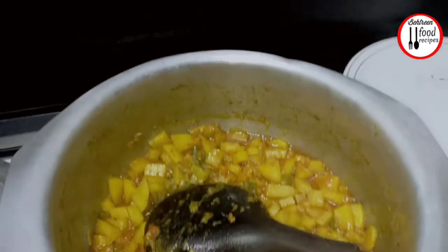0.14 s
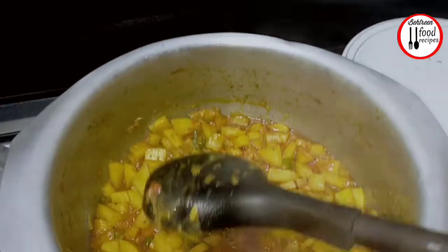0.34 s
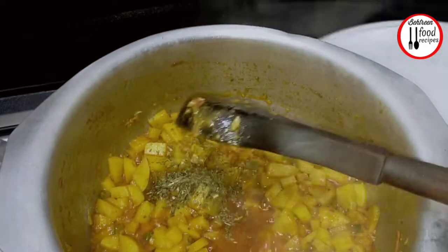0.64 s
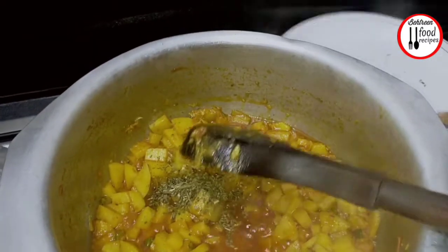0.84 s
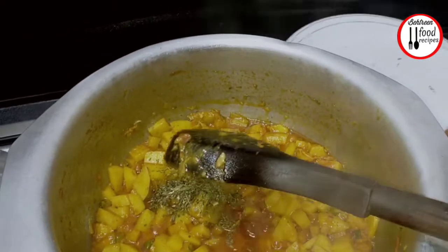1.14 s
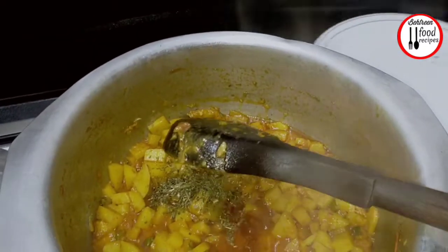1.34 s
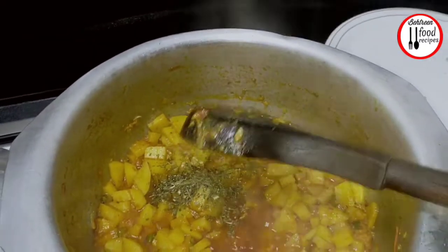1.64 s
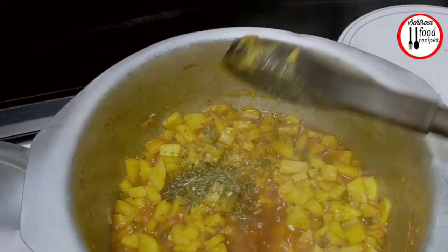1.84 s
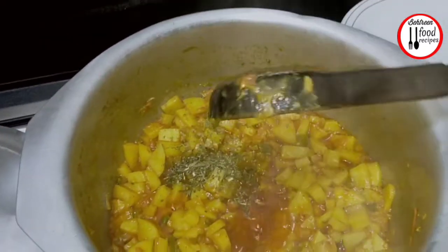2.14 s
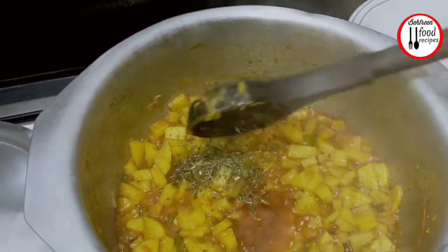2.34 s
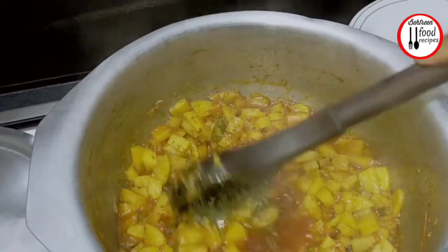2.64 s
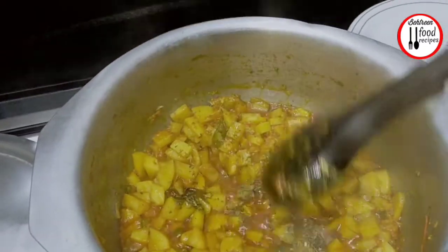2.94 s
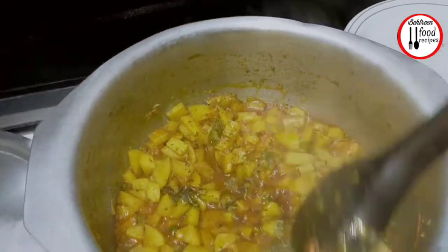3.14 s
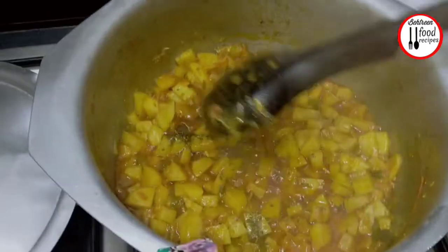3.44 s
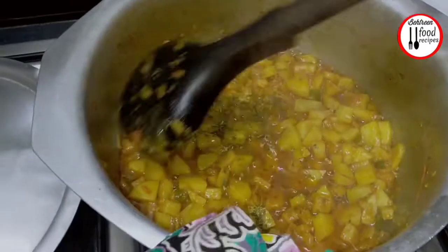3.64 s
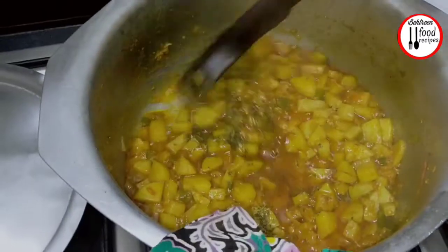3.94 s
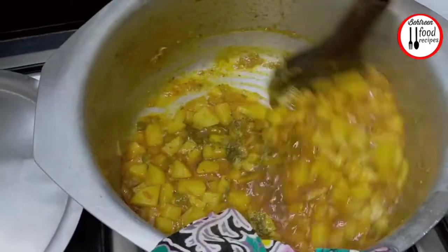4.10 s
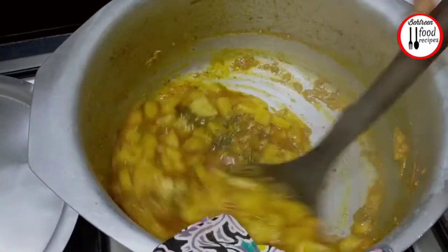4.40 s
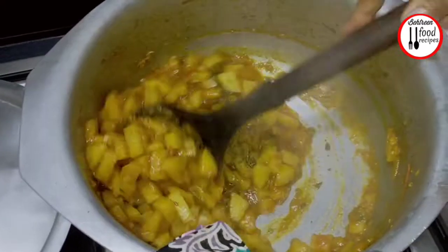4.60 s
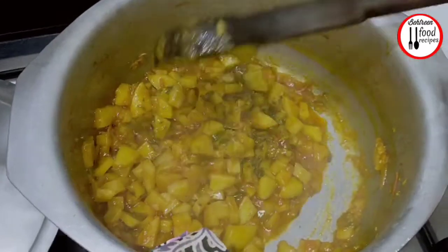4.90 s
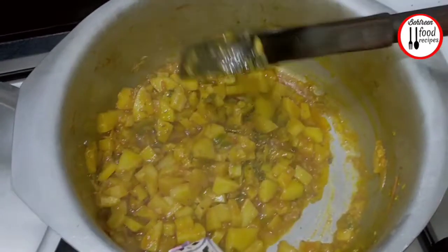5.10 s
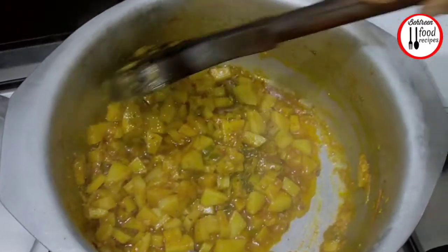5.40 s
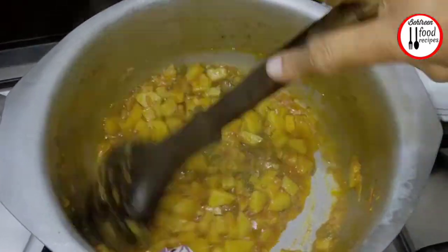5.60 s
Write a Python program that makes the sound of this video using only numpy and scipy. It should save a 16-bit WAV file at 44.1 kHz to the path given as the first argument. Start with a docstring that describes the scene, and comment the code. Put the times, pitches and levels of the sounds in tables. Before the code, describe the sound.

From the start to about 0.75 s, a metal pot of curry is jolted on its stove grate: a rapid, uneven string of loud ringing clanks with low booms and thuds, strongest around 0.3-0.75 s, with gritty grinding from 0.4 s. From 0.95 to 1.25 s it slides again with short low groans, then a solid knock at 1.3 s and a faint one at 1.43 s. The rumble fades by 1.8 s, leaving quiet simmer, fine crackling sizzle and popping bubbles. From 2.4 s a spoon makes soft, wet, scraping strokes, fuller and faster from 3.6 to 4.7 s, with a dull knock at 3.6 s, dry ticks near 3.7 s and faint taps. Bubbling calms by 4.7 s; a gentler stroke follows at 5.3-5.75 s, with a tiny low gulp at 5.5 s. Thin, bright bangle clinks are scattered throughout, clearest near 0.6 and 3.9 s. Close, nasal microphone, small kitchen.

```python
"""A stove top booms and thuds as a metal pot of simmering curry is dragged and jolted into place on its grate.
Then a wooden spoon ploughs through the wet vegetables, knocks on the pot and ticks drily. Bubbles pop, short squeaks
and a low gulp are heard, the sauce sizzles, and something small and bright, likely bangles on the cook's wrist, clinks.
Blows and slips ring a bank of pot modes, click-fed resonators make the small bubbles, gliding sines the pops and ticks,
detuned decaying sines the bangles, coloured clicks and noise the simmer. The close microphone has a nasal peak."""
import sys
import numpy as np
from scipy import signal
from scipy.fft import rfft, irfft, next_fast_len
from scipy.io import wavfile
from scipy.ndimage import uniform_filter1d, minimum_filter1d

SR = 44100
rng = np.random.default_rng(int(sys.argv[2]) if len(sys.argv) > 2 else 0)


def dump(signal):
    """Clip the signal to [-1, 1] and save it as 16-bit WAV at the path in sys.argv[1]."""
    limited = np.clip(np.atleast_2d(signal).T, -1, 1)
    pcm = np.round(limited * 32767).astype(np.int16)
    wavfile.write(sys.argv[1], SR, pcm)


N = 253977

# pot catching on the grate: [t/s, strength/dB, weight/dB, grit/dB, rebound delay/s, favoured mode f/Hz]
JOLTS = [(.0389, -12.5, 1, -5, 0.03, 2450), (.0948, -13.5, 4, -2, .012, 2500),
         (.1999, -13.5, 0.5, -3.5, 0.035, 2637), (.3048, -9, 3, -3, 0.012, 2560),
         (.3972, -6, -7.5, 6.5, 0.024, 2396), (.4506, -7.5, -1.5, 8, 0.02, 2530),
         (.519, -8, -9.5, 6, 0.018, 2460), (.589, -9.5, 7.5, 6.5, .039, 2345),
         (.7108, -12, -1, 9.5, 0.024, 2590), (.7284, -10.5, 10, 1.5, .012, 2475),
         (1.1537, -17, 13.5, -1.5, 0.049, 2470), (1.3131, -8, 2.5, -8.5, 0.069, 843),
         (1.4343, -22.5, 5.5, 0, 0.037, 1157)]
# spoon against the pot: [t/s, strength/dB, weight/dB, grit/dB, rebound delay/s, favoured mode f/Hz]
KNOCKS = [(3.1108, -41.5, 15.5, 0, 0.0063, 791), (3.6171, -27.5, -3.5, -4.5, .017, 169.6),
          (3.7771, -42, 13.5, 4, 0.027, 399), (4.279, -46.5, -6, 9, 0.035, 2450),
          (4.4984, -47.5, 3, -5, 0.015, 2500), (5.3121, -39.5, 4.5, 1.5, 0.0052, 423)]
# bubble pops, short squeaks, dry spoon ticks and a low gulp: [t/s, level before trim/dB, starting f/Hz, t60/s]
POPS_AND_TICKS = [(0.681, -25, 2570, 0.021), (0.915, -27.5, 2213, 0.11), (0.962, -20, 2420, 0.033),
                  (0.982, -24, 2210, 0.033), (2.186, -34.5, 2710, 0.048), (2.332, -31, 7220, 0.011),
                  (2.922, -33, 2416, 0.061), (3.335, -22, 2576, 0.028), (3.701, -18.5, 2700, 0.0064),
                  (3.728, -16, 3050, 0.0036), (3.7463, -14.5, 2540, 0.0049), (3.868, -27, 2490, 0.019),
                  (4.056, -26.5, 2360, 0.056), (4.68, -25, 2420, 0.016), (4.714, -30.5, 2340, 0.038),
                  (4.989, -33.5, 10060, 0.013), (5.488, -22, 2500, 0.007), (5.511, -37.5, 255, 0.16),
                  (5.626, -31.5, 2446, 0.027)]
# bangles touching: [t/s, level before trim/dB]
CLINKS = [(0.2099, -41), (0.607, -29), (1.7836, -34.5), (2.6155, -37), (3.5778, -34.5), (3.594, -35),
          (3.8977, -26.5), (4.4573, -38), (4.671, -37.5), (5.3102, -33), (5.59, -38)]
# pot and stove top ringing together, before each spot's own balance: [f/Hz, energy level/dB, t60/s]
POT_MODES = [(82.3,-23,1),(97.67,-21,0.71),(117.9,-27,1),(150.3,-26,0.21),(172,-32.5,1),(244.8,-26.5,0.79),(294.2,-23.5,0.41),(332.3,-23,0.79),(415.6,-28.5,0.66),(800.6,-19.5,0.24),(865,-25.5,0.6),(937,-24,0.25),(1064,-24,0.045),(1176,-24,0.27),(1310,-25,0.29),(1560,-26.5,0.39),(1730,-24.5,0.15),(1926,-22,0.21),(2302,-23,0.19),(2398,-21.5,0.25),(2575,-26,0.22),(2598,-20,0.059),(2780,-21.5,0.17),(3350,-22,0.23)]
# decay of the crowd of weaker pot modes: [f/Hz, t60/s]
POT_DECAY = [(90,1),(300,0.34),(1000,0.29),(2500,0.24),(7000,0.18),(15000,0.18)]
# how readily the grate contact sounds: [f/Hz, level/dB]
JOLT_COLOUR = [(45,9.5),(100,18),(180,12.5),(320,14),(550,18.5),(1200,25),(2500,24),(6000,4)]
# how readily the spoon contact sounds: [f/Hz, level/dB]
KNOCK_COLOUR = [(45,17),(100,35),(180,37.7),(350,28.9),(600,26),(1000,32.2),(1700,28.6),(2500,29.9),(6000,20.6)]
# microphone and its port resonances: [f/Hz, level/dB]
MIC = [(45,3),(75,0.5),(1800,-1.5),(2150,0.5),(2480,7.5),(2800,2),(3150,0.5),(5000,-2.5),(5900,-1),(8200,0),(9200,-14),(11000,-8.5),(13000,-19.5),(15500,-14.5)]
# bangle modes before each ring's detuning: [f/Hz, level/dB, t60/s]
BANGLE_MODES = [(8770,-9.5,0.064),(10560,-6,0.087),(12500,-4,0.064),(13300,3,.06),(13500,-9,.06),(14200,-18,.07),(14600,9,0.048),(15100,0,0.074),(15650,-18,.07)]
# the hollow above the curry, colouring simmer and stirring: [f/Hz, level per Hz/dB]
HOLLOW = [(25,8.5),(60,6),(110,4.5),(200,1.5),(330,10),(600,0.5),(800,-0.5),(1020,8.5),(1300,-3),(2500,3.5),(5000,-8.5),(9000,-0.5),(15000,9.5)]
# stove top shaken by the pot, before trim: [t/s, boom level/dB, thud level/dB]
STOVE = [(0.0, -37, -43.5), (0.11, -43.5, -37), (0.24, -47, -53), (0.416, -35.5, -29), (0.7, -37, -32),
         (0.746, -36, -25), (1.012, -36.5, -38.5), (1.222, -40.5, -37), (1.258, -47, -40),
         (1.328, -42.5, -43.5), (1.774, -62, -59), (1.8, -70, -56.5)]
# the pot's foot catching and groaning: [t/s, length/s, level/dB, central slip rate/Hz, glide/octaves]
GROANS = [(0.943,0.063,-33,430,0.29),(1.062,0.043,-29,350,-0.026),(1.192,0.061,-30.5,395,.04)]
# share of a blow's weight heard across the spectrum: [f/Hz, share]
WEIGHT_SHARE = [(350,0.83),(1000,0.84),(2500,0.047)]
# share of a blow's grit heard across the spectrum: [f/Hz, share]
GRIT_SHARE = [(2500,0),(6000,1)]
# pot sliding on the grate: [t/s, length/s, force level/dB]
SLIDES = [(.04, 0.057, -7), (.39, 0.27, 0), (.71, 0.037, 0), (.945, 0.3, -8), (1.33, 0.073, -29)]
# spoon strokes through the curry: [t/s, length/s, speed level/dB, pressure level on the pot/dB]
STROKES = [(2.39, .34, -5, -13), (2.76, 0.23, -9.5, -13), (3.16, 0.19, -7.5, -2), (3.63, 0.26, -3, 0.5),
           (3.92, 0.33, 0, -0.5), (4.27, 0.19, -2, 2), (4.49, .2, -5.5, -15), (5.32, 0.42, -11, -2)]

TIME = np.arange(N) / SR
RING_TIME = TIME[:SR]
CUTOFF_HZ = 16100
BOOM_HZ, THUD_HZ = (70, 200), (210, 520)
REBOUND_LOSS_DB_PER_S = 177  # the later the rebound, the weaker it is
SLIDE_ATTACK_S, SLIDE_RELEASE_S = 0.012, 0.083
STROKE_ATTACK_S, STROKE_RELEASE_S = 0.025, 0.031
# bubbling at rest, against a full stroke; it calms as cool vegetables are turned onto the base
REST_DB, CALMED_DB, CALMED_AT_S, CALMING_S = -9.5, -16, 4.73, 0.52


def from_db(db):
    """Decibels to gain."""
    return 10 ** (np.asarray(db) / 20)


def rms_one(x):
    """Scale to unit rms."""
    return x / np.sqrt(np.mean(x ** 2) + 1e-20)


def gains_in_time(rows):
    """One gain curve per dB column, fading to silence within 50 ms outside the rows."""
    s, *columns = np.transpose(rows)
    present = np.interp(TIME, [s[0] - .05, s[0], s[-1], s[-1] + .05], [0, 1, 1, 0])
    return [from_db(np.interp(TIME, s, column)) * present for column in columns]


def gestures(rows, attack_s, release_s):
    """Each movement swells, holds for its length and dies away; one gain curve per dB column."""
    power = 0
    for s, length, *levels_db in rows:
        swell = np.clip((TIME - s) / attack_s, 0, 1)
        release = np.exp(-np.maximum(TIME - s - length, 0) / release_s)
        power = power + np.outer(from_db(levels_db), swell * release) ** 2
    return np.sqrt(power)


def at_hz(points, hz):
    """Read a spectrum on a log-frequency axis."""
    f, value = np.transpose(points)
    return np.interp(np.log(np.maximum(hz, 1)), np.log(f), value)


def colour(x, spectrum):
    """Causal (minimum-phase) filter with the given spectrum."""
    size = 2 * next_fast_len(len(x) // 2 + SR // 10)
    hz = np.arange(size // 2 + 1) * SR / size
    cepstrum = irfft(np.log(from_db(at_hz(spectrum, hz))))
    # folding the cepstrum forward in time gives minimum phase
    cepstrum[1:size // 2] *= 2
    cepstrum[size // 2 + 1:] = 0
    response = np.exp(rfft(cepstrum))
    return irfft(rfft(x, size) * response)[:len(x)]


def band(x, low_hz, high_hz, order=3):
    """Butterworth band-pass."""
    edges = [low_hz, min(high_hz, .45 * SR)]
    return signal.sosfilt(signal.butter(order, edges, "band", fs=SR, output="sos"), x + 1e-18)


def drift(rate):
    """Random wander of unit rms, joined by straight lines between rate new values a second."""
    values = rng.standard_normal(3000)
    return rms_one(np.interp(TIME * min(rate, 500), np.arange(3000), values))


def grains(per_s, spread_db):
    """Clicks at random times, of random size and sign; spread_db sets how uneven they are."""
    sizes = from_db(spread_db * np.minimum(rng.exponential(1, N), 4)) * rng.choice([-1, 1], N)
    return sizes * (rng.random(N) < per_s / SR)


def add(out, s, sound):
    """Mix a sound in at s seconds."""
    start = max(round(s * SR), 0)
    out[start:start + len(sound)] += sound[:N - start]


def dying(t60):
    """Exponential decay of unit energy."""
    fall = from_db(-60 * RING_TIME / t60)
    return fall / np.sqrt(np.sum(fall ** 2))


def register(x, low_hz, high_hz):
    """One register of a rubbing sound, its slow swells evened out."""
    part = band(x, low_hz, high_hz)
    power = np.abs(uniform_filter1d(part ** 2, size=SR // 8))
    return part / np.sqrt(power + 1e-12)


def kitchen(x, wet_db, t60):
    """Close reflections from the pot wall and the kitchen, as a decaying noise tail."""
    tail = rng.standard_normal(SR) * dying(t60)
    return x + from_db(wet_db) * signal.fftconvolve(x, tail)[:N]


def bubbles(per_s, spread_db, low_hz, high_hz, cycles, count=24):
    """Small bubbles at random, each ringing a few cycles at one of count pitches."""
    clicks, dealt, out = grains(per_s, spread_db), rng.integers(0, count, N), 0
    for k, hz in enumerate(np.geomspace(low_hz, min(high_hz, .45 * SR), count)):
        # two-pole resonator: down 60 dB after the given number of cycles
        r = np.exp(-np.log(1000) * hz / (cycles * SR))
        w = 2 * np.pi * hz / SR
        struck = clicks * (dealt == k) + 1e-18
        out = out + np.sqrt(hz) * signal.lfilter([1, -1], [1, -2 * r * np.cos(w), r * r], struck)
    return rms_one(out)


def sauce(squelch_db=-47.0, blip_db=-51.5, sizzle_db=-46.5, simmer_db=-48.5, simmer_follows=0.37):
    """Stirring opens wet pockets and wipes sauce over hot metal; beneath it the pot simmers on."""
    speed, _ = gestures(STROKES, STROKE_ATTACK_S, STROKE_RELEASE_S)
    rest_db = np.interp(TIME, [CALMED_AT_S - CALMING_S, CALMED_AT_S], [REST_DB, CALMED_DB])
    activity = np.hypot(speed, from_db(rest_db))
    wet = bubbles(per_s=600, spread_db=3.0, low_hz=1500, high_hz=3400, cycles=26)
    blips = bubbles(per_s=60, spread_db=2.0, low_hz=2100, high_hz=2800, cycles=55)
    fizz = bubbles(per_s=6000, spread_db=3.5, low_hz=4700, high_hz=16000, cycles=10)
    fizz = fizz * from_db(2.4 * drift(28))  # the sizzle comes in spurts
    surface = from_db(squelch_db) * wet + from_db(blip_db) * blips + from_db(sizzle_db) * fizz
    simmer = rms_one(grains(per_s=2500, spread_db=3.5)) + 0.41 * rng.standard_normal(N)
    # the simmer calms less than the bubbling does
    simmer_gain = from_db(simmer_db + simmer_follows * (rest_db - REST_DB))
    return activity * surface + simmer_gain * colour(simmer, HOLLOW)


def bangles(level_db=2.0, rattle=0.48, rattle_t60=0.17):
    """Thin rings touch, then rattle briefly: four detuned copies of the modes, struck again at random."""
    out, t = np.zeros(N), RING_TIME[:SR // 4]
    for s, db in CLINKS:
        ring = 0
        for hz, mode_db, t60 in 4 * list(BANGLE_MODES):
            cycles = hz * rng.uniform(.94, 1.06) * t + rng.random()
            ring = ring + from_db(mode_db - 60 * t / t60) * np.sin(2 * np.pi * cycles)
        hits = rng.standard_normal(len(t)) * (rng.random(len(t)) < 400 / SR)
        touches = rattle * hits * from_db(-60 * t / rattle_t60)
        touches[0] = 1
        add(out, s, from_db(db + level_db) * signal.fftconvolve(ring, touches) / 2)
    return out


def pops_and_ticks(level_db=-3.5, rise_per_s=0.76, opening_share=0.04):
    """Pops, squeaks, ticks and a gulp open quickly and rise a little in pitch as they die away."""
    out, t = np.zeros(N), RING_TIME[:SR // 4]
    for s, db, hz, t60 in POPS_AND_TICKS:
        opening = 1 - np.exp(-t / (opening_share * t60))
        shape = opening * np.exp(-np.log(1000) * t / t60)
        tone = np.sin(2 * np.pi * hz * t * (1 + rise_per_s * t))
        gain = from_db(db + level_db - at_hz(MIC, hz))  # offsets the microphone colour at this pitch
        add(out, s, gain * shape / shape.max() * tone)
    return out


def pot_responses(count, direct_db=-14.0, crowd_db=-3.0, crack_db=-5.0, crack_t60=0.038):
    """The pot's answer to a click at count spots: the click, a crack, clear modes and a crowd of weak ones."""
    modes = np.array([from_db(db) * np.sqrt(2) * dying(t60) * np.sin(2 * np.pi * hz * RING_TIME)
                      for hz, db, t60 in POT_MODES])
    # each spot excites the modes in its own balance
    size = (count, len(modes))
    strengths = rng.uniform(.5, 1.4, size) * rng.choice([-1, 1], size)
    white = rng.standard_normal((3, count, SR))
    edges, crowd = np.geomspace(60, 18000, 8), 0
    for k, (low, high) in enumerate(zip(edges, edges[1:])):
        decay = dying(at_hz(POT_DECAY, np.sqrt(low * high)))
        crowd = crowd + band(white[k % 2], low, high, order=2) * decay
    crack = white[2] * dying(crack_t60)
    attack = from_db(direct_db) * (RING_TIME == 0) + from_db(crack_db) * crack
    return attack + strengths @ modes + from_db(crowd_db) * crowd


def friction(slips_per_s, spread_db, judder_db, judder_rate, crowd_db):
    """Tiny slips, bunched by stick and slip, ring the pot from three spots."""
    judder = from_db(judder_db * drift(judder_rate))
    return sum(signal.fftconvolve(grains(slips_per_s, spread_db) * judder, response)[:N]
               for response in pot_responses(count=3, crowd_db=crowd_db))


def stirring(boom_db=-53.0, thud_db=-54.0, scrape_db=-45.0):
    """Wet wood slides softly on the metal: speed makes it scrape, pressure makes the pot rumble."""
    speed, pressure = gestures(STROKES, STROKE_ATTACK_S, STROKE_RELEASE_S)
    slide = friction(slips_per_s=450, spread_db=0.0, judder_db=5.5, judder_rate=56, crowd_db=-2.0)
    mush = colour(grains(per_s=1300, spread_db=2.0), HOLLOW)  # vegetables tumbling ahead of the spoon
    rub = 0.25 * rms_one(slide) + rms_one(mush)
    rumble = from_db(boom_db) * register(rub, *BOOM_HZ) + from_db(thud_db) * register(rub, *THUD_HZ)
    return pressure * rumble + from_db(scrape_db) * speed * register(rub, 540, 3060)


def groans(jitter=0.023, waver=0.0303, pot_db=-4.0):
    """Regular stick and slip: a gliding pulse train, heard directly and through the pot."""
    out = np.zeros(N)
    for (s, length, db, slip_hz, glide), response in zip(GROANS, pot_responses(count=len(GROANS))):
        along = np.clip((TIME - s) / length, 0, 1)
        unsteady = np.exp(waver * drift(60) + jitter * drift(400))
        rate = slip_hz * 2 ** (glide * (along - .5)) * unsteady
        pulses = np.diff(np.floor(np.cumsum(rate) / SR), prepend=0)
        slips = pulses * np.sqrt(np.abs(np.sin(np.pi * along)))
        through_pot = signal.fftconvolve(slips, response)[:N]
        sound = band(slips + from_db(pot_db) * through_pot, 540, 1410, order=2)
        # level is set by energy spread over the groan's length
        out += from_db(db) * np.sqrt(length * SR / N) * rms_one(sound)
    return out


def dragging(boom_db=-0.5, thud_db=0.0, grind_db=-27.5, grit_db=-40.5, grit_growth=1.5):
    """The pot grinds over the grate and shakes the stove top; grit grows faster than the force."""
    boom, thud = gains_in_time(STOVE)
    force, = gestures(SLIDES, SLIDE_ATTACK_S, SLIDE_RELEASE_S)
    rub = friction(slips_per_s=150, spread_db=5.5, judder_db=2.5, judder_rate=64, crowd_db=2.5)
    shake = friction(slips_per_s=300, spread_db=-0.5, judder_db=1.0, judder_rate=30, crowd_db=-9.5)
    booming = from_db(boom_db) * boom * register(shake, *BOOM_HZ)
    thudding = from_db(thud_db) * thud * register(shake, *THUD_HZ)
    grind = from_db(grind_db) * force * register(rub, 487, 2260)
    grit = from_db(grit_db) * force ** grit_growth * register(rub, 4400, 10600)
    return booming + thudding + grind + grit


def blows(rows, contact, favoured_db, favoured_t60, spot_db):
    """A blow and its weaker rebound: weight shifts bass, grit shifts treble, the spot favours one mode."""
    out, (hz, contact_db) = np.zeros(N), np.transpose(contact)
    responses = pot_responses(count=2 * len(rows)).reshape(len(rows), 2, SR)
    for (s, db, weight_db, grit_db, rebound_s, mode_hz), (first, second) in zip(rows, responses):
        mode = 2 * np.sqrt(mode_hz / SR) * dying(favoured_t60) * np.cos(2 * np.pi * mode_hz * RING_TIME)
        favoured = from_db(favoured_db) * mode
        force_db = db + weight_db * at_hz(WEIGHT_SHARE, hz) + grit_db * at_hz(GRIT_SHARE, hz)
        # the octaves around the favoured mode are lifted too
        near_db = spot_db * np.exp(-np.log2(hz / mode_hz) ** 2)
        spectrum = np.transpose([hz, contact_db + force_db + near_db])
        add(out, s, colour(first + favoured, spectrum))
        rebound_gain = from_db(-REBOUND_LOSS_DB_PER_S * rebound_s)
        add(out, s + rebound_s, rebound_gain * colour(second, spectrum))
    return out


def scene():
    """Curry, bangles and metal, all straight ahead: both channels are alike."""
    curry = kitchen(sauce() + pops_and_ticks(), wet_db=-13.0, t60=.16)
    knocks = blows(KNOCKS, KNOCK_COLOUR, favoured_db=0.0, favoured_t60=0.38, spot_db=11.0)
    jolts = blows(JOLTS, JOLT_COLOUR, favoured_db=-6.0, favoured_t60=.18, spot_db=1.5)
    metal = stirring() + knocks + groans() + dragging() + jolts
    return np.tile(curry + bangles() + metal, (2, 1))


def record(dry):
    """Microphone colour, a fast limiter, then the top is cut."""
    heard = np.array([colour(channel, MIC) for channel in dry])
    ceiling = .48
    room_left = ceiling / np.maximum(np.abs(heard).max(axis=0), ceiling)
    window = SR // 250  # 4 ms
    gain = uniform_filter1d(minimum_filter1d(room_left, size=window), size=window)
    top_cut = signal.ellip(10, .3, 80, CUTOFF_HZ, fs=SR, output="sos")
    return signal.sosfilt(top_cut, heard * gain)


dry = scene()
out = record(dry)
dump(out)
```